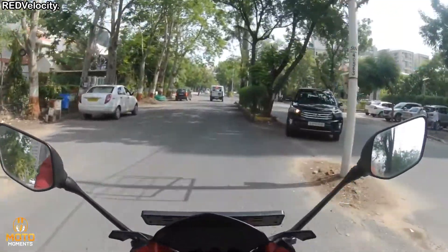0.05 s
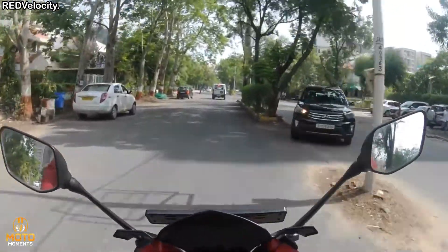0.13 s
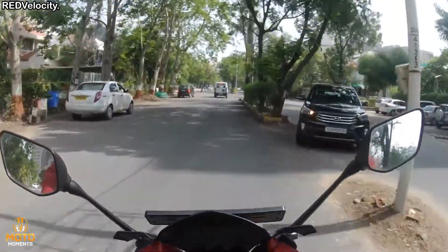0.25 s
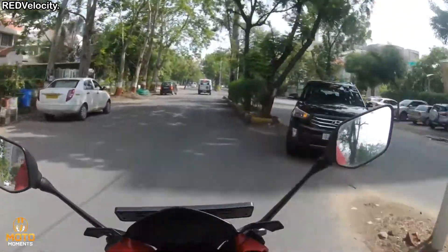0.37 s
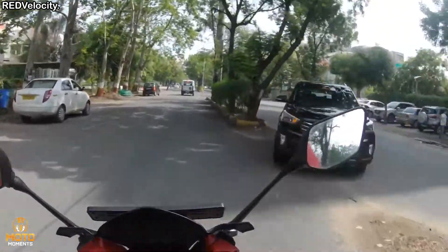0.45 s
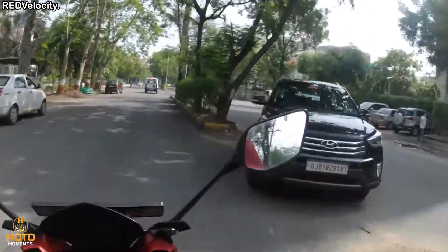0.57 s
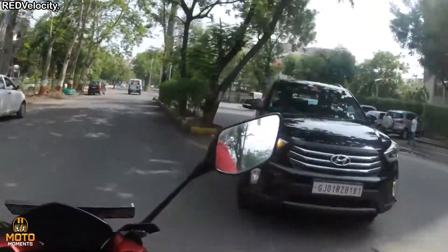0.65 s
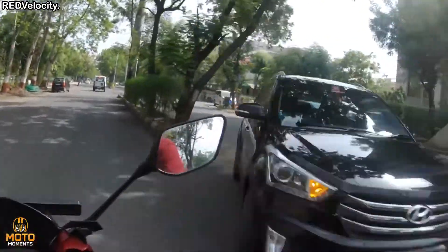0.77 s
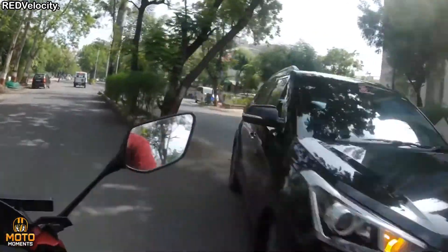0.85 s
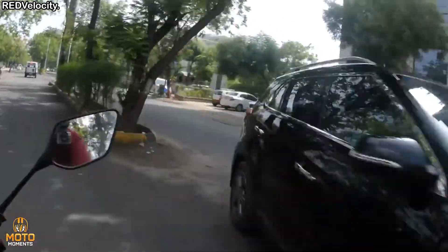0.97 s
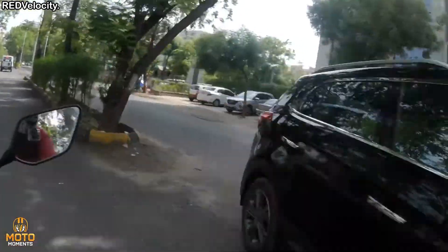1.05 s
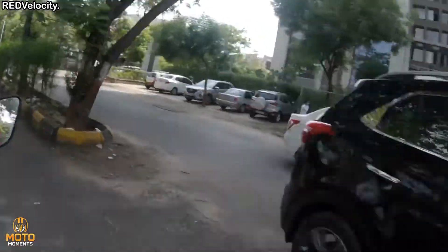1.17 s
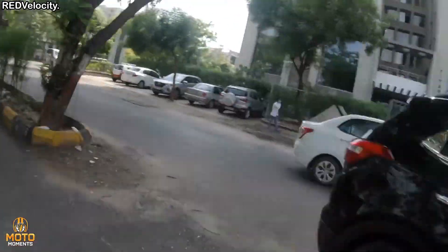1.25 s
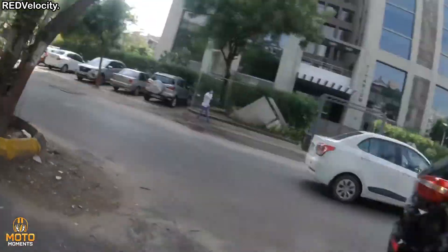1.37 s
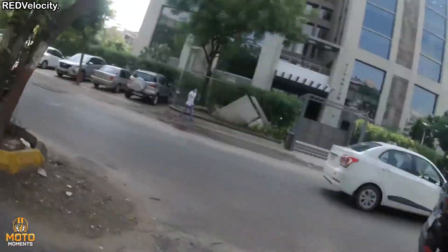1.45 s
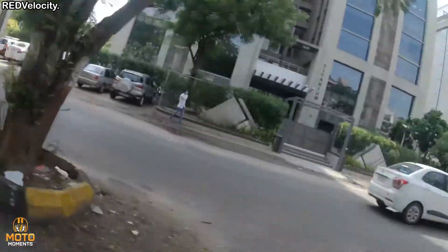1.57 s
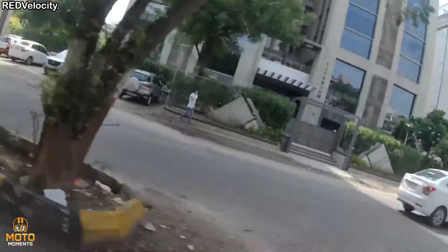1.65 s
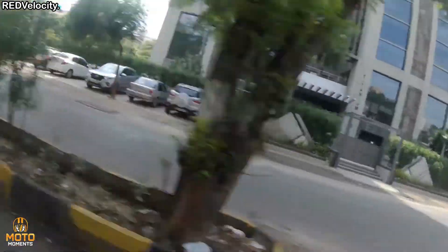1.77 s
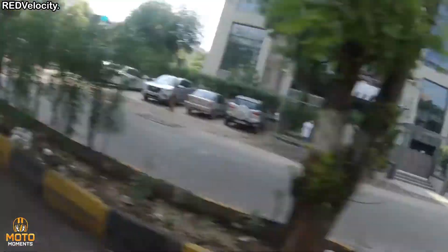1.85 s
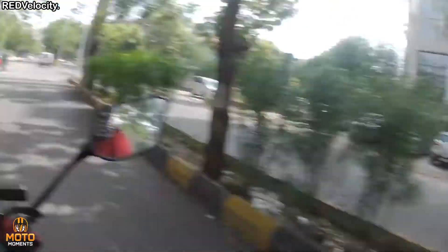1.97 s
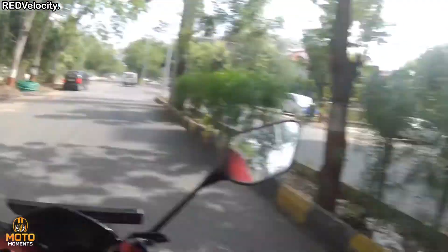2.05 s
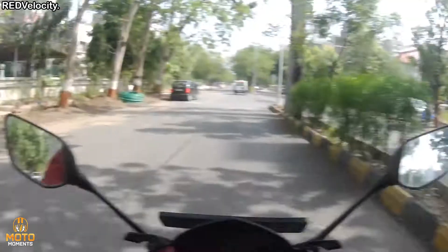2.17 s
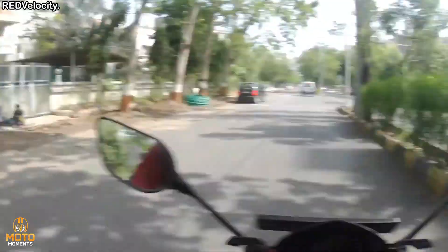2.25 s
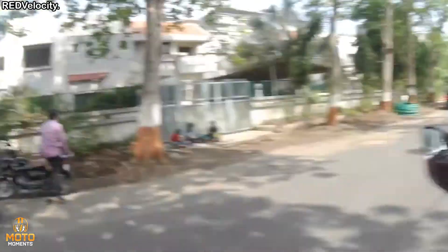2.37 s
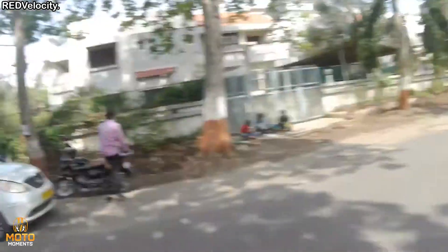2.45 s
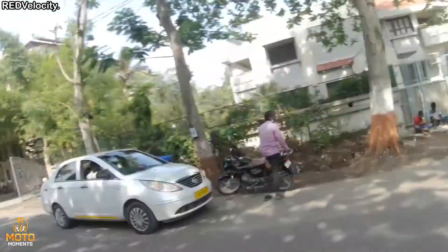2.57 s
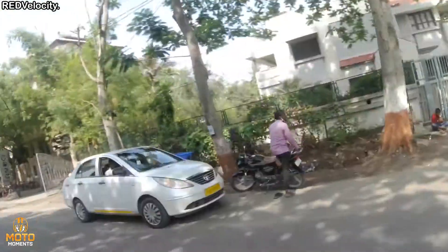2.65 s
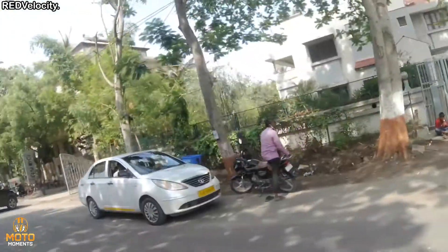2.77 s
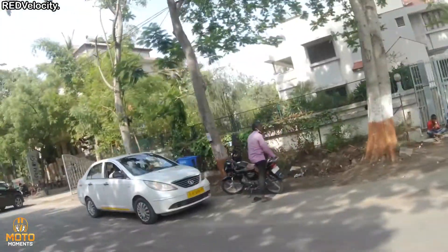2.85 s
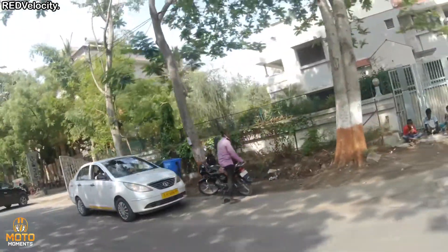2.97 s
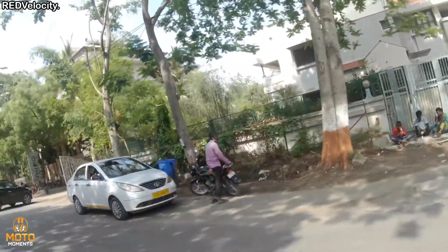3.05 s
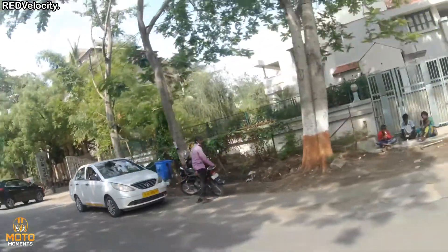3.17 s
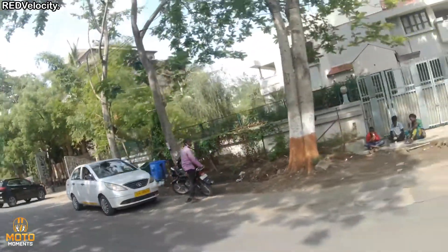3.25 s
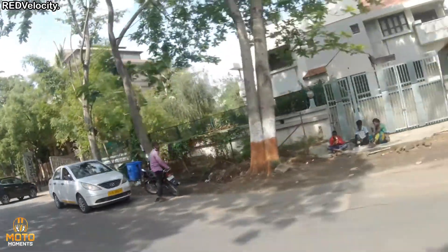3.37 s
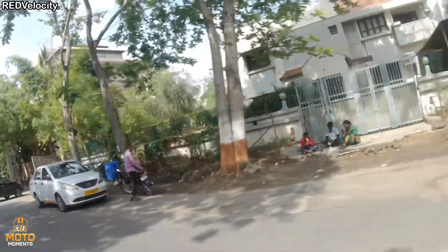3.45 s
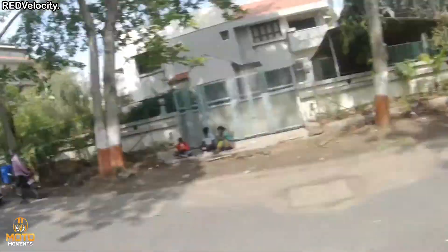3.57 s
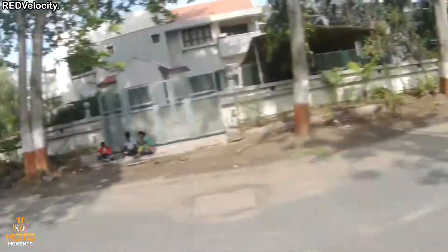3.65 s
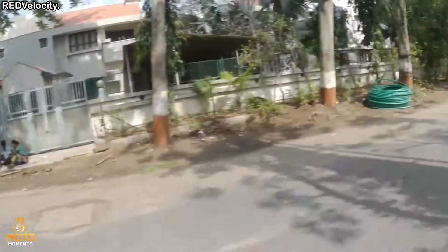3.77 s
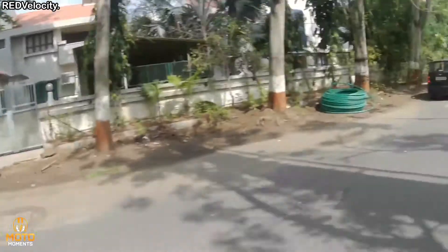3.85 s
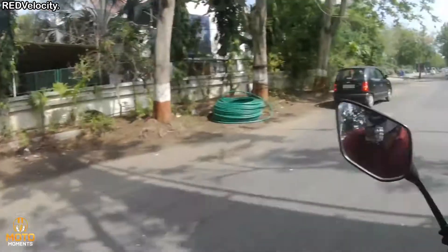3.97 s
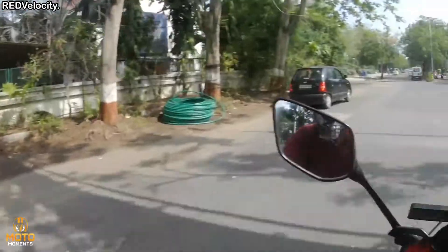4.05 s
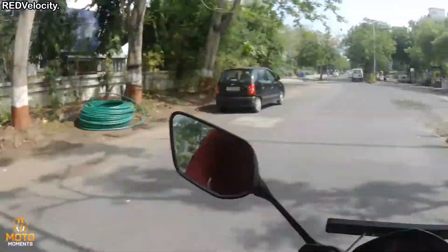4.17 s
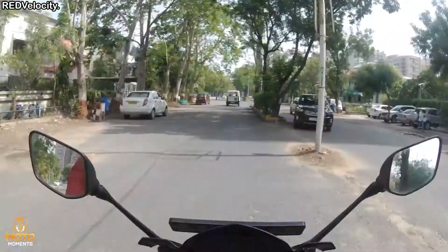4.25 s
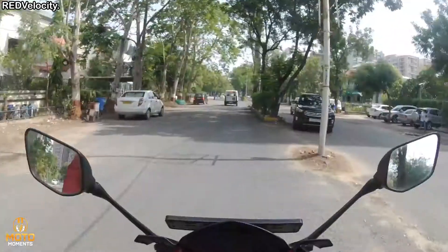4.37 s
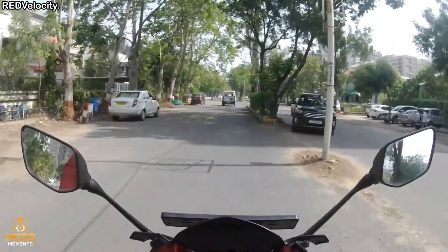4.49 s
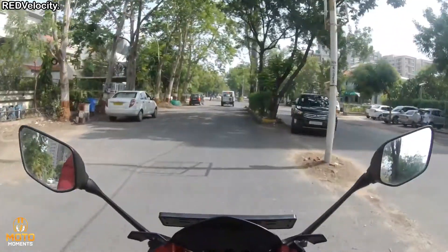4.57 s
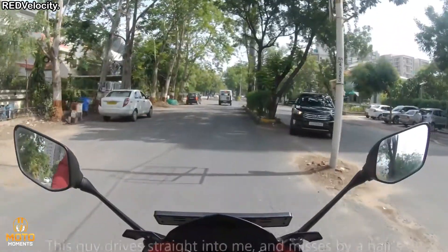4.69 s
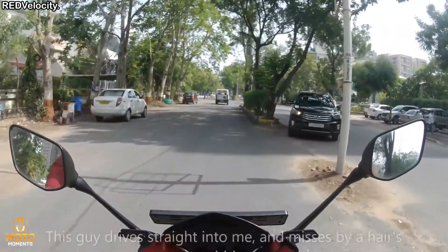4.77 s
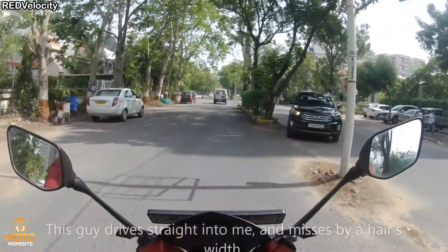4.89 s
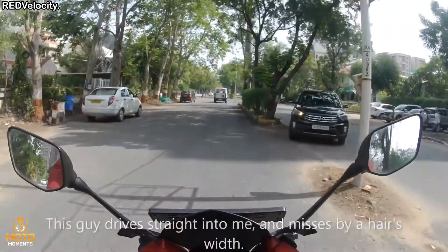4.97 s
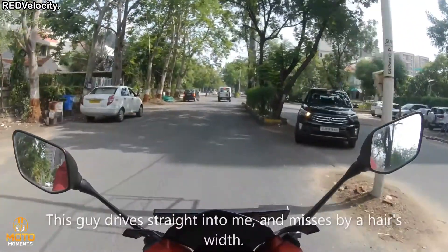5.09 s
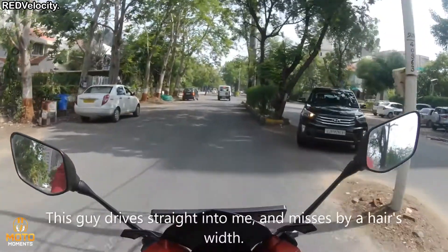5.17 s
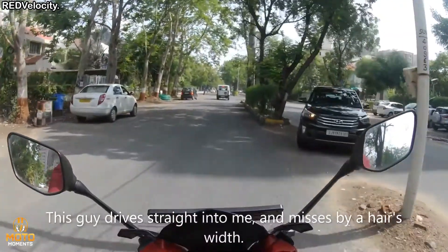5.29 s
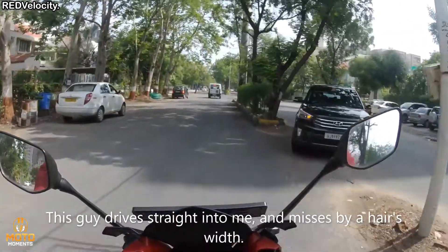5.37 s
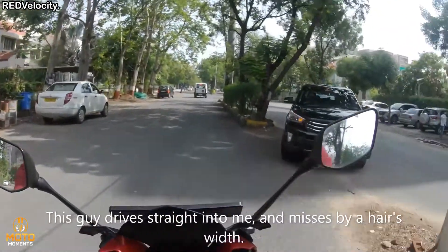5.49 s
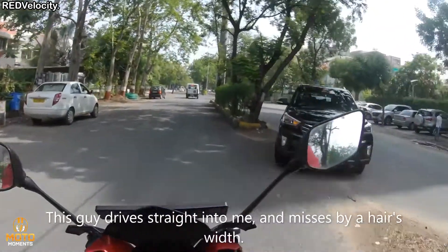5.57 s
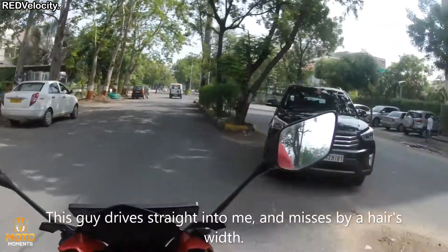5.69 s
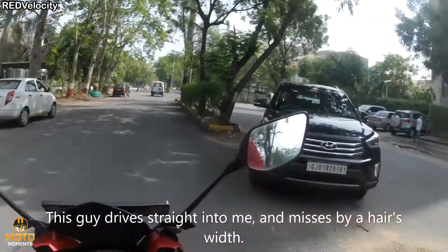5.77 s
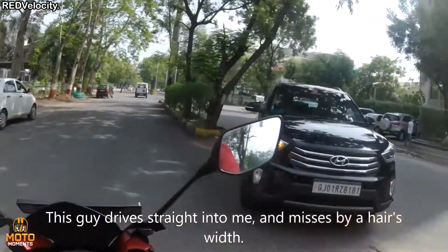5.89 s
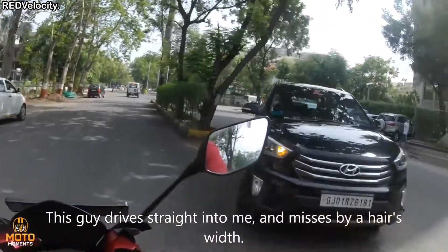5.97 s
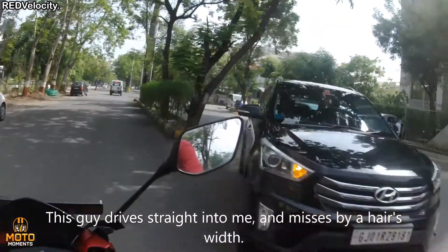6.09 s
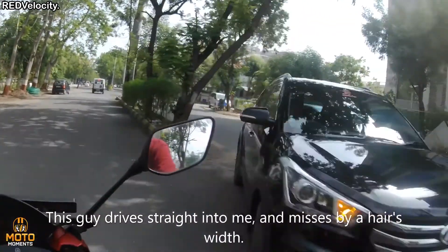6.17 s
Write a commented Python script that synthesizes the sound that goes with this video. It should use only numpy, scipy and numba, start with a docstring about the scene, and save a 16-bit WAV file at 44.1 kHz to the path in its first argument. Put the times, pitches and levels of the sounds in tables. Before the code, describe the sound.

A single-cylinder motorcycle thumps and clatters along a street, one harsh two-tone horn blast, helmet knocks and wind, then everything repeats slowed and lower.

```python
"""A street, heard at two microphone ports on a rider's helmet: a slow single-cylinder motorcycle thumps and clatters.
Firing-rate harmonics make the thumps; filtered noise swelling at each firing makes the engine clatter and treble.
Shaped noise makes wind, rustle and air hiss; decaying sines make knocks; two sets of overtones make one horn blast.
After a short fade the first moments are played again in slow motion, at four sevenths of the speed."""
import sys
import numpy as np
from scipy import signal
from scipy.fft import rfft, irfft, next_fast_len
from scipy.io import wavfile
from scipy.ndimage import uniform_filter1d
from numba import njit

SR = 44100
rng = np.random.default_rng(int(sys.argv[2]) if len(sys.argv) > 2 else 0)


def bounce(signal):
    """Save signal as a 16-bit WAV file at the path given by the first command-line argument."""
    frames = np.transpose(np.atleast_2d(signal))
    limited = np.clip(frames, -1, 1)
    pcm = np.round(limited * 32767).astype(np.int16)
    wavfile.write(sys.argv[1], SR, pcm)


def rack_gain(trim_db):
    """Turn a fader trim in dB into the linear factor to multiply a signal by."""
    fader = np.asarray(trim_db, float)
    return 10 ** (fader / 20)


N = 274743

LEAD_S = 0.21  # ride computed ahead of time zero
T = np.arange(-int(LEAD_S * SR), int(4.4 * SR)) / SR  # ride time, s
PRESS_S, HORN_ATTACK_S, HISS_END_S = 0.203, 0.007, 0.555

# engine treble spectrum: (frequency [Hz], relative density [dB])
TREBLE_COLOUR = [(1200, -25), (1700, 0.5), (2000, -1.5), (2600, -8.5), (3300, -9), (3800, -12.5),
                 (4600, -21.5), (5200, -29.5), (6700, -36.5), (9500, -47.5), (10500, -130)]


def curve(rows):
    """Interpolates the columns of a (time, ...) table over the ride."""
    s, *columns = np.transpose(rows)
    return [np.interp(T, s, c) for c in columns]


def after(s):
    """Seconds since a moment, zero before it."""
    return np.clip(T - s, 0, None)


def unit(x):
    """Scales to rms 1."""
    return x / np.sqrt(np.mean(x ** 2))


def noise():
    """Two unrelated white noises."""
    return rng.standard_normal((2, len(T)))


def walk(rate_hz):
    """Random levels held 1 / rate_hz and slewed twice; spread near 1."""
    hold = int(SR / rate_hz)
    steps = np.repeat(rng.standard_normal(len(T) // hold + 1), hold)
    smooth = uniform_filter1d(uniform_filter1d(steps, hold), hold)
    return 1.055 * smooth[:len(T)]


def shape(x, points, peaks=()):
    """Minimum-phase filter from (Hz, dB) points plus (Hz, width Hz, dB) resonances."""
    size = next_fast_len(len(T), True)
    f = np.arange(size // 2 + 1) * SR / size + 1  # +1 Hz avoids log(0)
    hz, db = np.transpose(points)
    db = np.interp(np.log(f), np.log(hz), db)
    for peak_hz, width_hz, top_db in peaks:
        db = db + top_db / (1 + (2 * (f - peak_hz) / width_hz) ** 2)
    # folding the cepstrum makes the response causal
    cepstrum = irfft(db * np.log(10) / 20, size)
    cepstrum[1:size // 2] *= 2
    cepstrum[size // 2 + 1:] = 0
    response = np.exp(rfft(cepstrum))
    return irfft(rfft(x, size) * response, size)[..., :len(T)]


def air_hiss():
    """Thin steady hiss of air past the ports."""
    # (frequency [Hz], relative density [dB])
    colour = [(2500, -32), (4200, -2), (6000, -11), (9500, -21), (10500, -90)]
    return unit(shape(noise(), colour)) * rack_gain(-78)


def wind():
    """Low noise, randomly swelling: slow buffeting around the helmet with a boom resonance."""
    # gust level: (time [s], level [dB])
    level = [(0.0, -46), (0.5, -57.5), (0.98, -51), (1.11, -37), (1.58, -40.5), (1.75, -47.5), (2.01, -54),
             (2.12, -42.5), (2.5, -61.5), (2.61, -39.5), (2.86, -38.5), (3.0, -47), (3.28, -42.5),
             (3.54, -35), (3.94, -58), (4.12, -50), (4.3, -62.5)]
    # (frequency [Hz], relative density [dB])
    colour = [(10, -19), (25, -15), (55, -6.5), (75, -10.5), (110, -13), (200, -22), (500, -54.5),
              (3000, -130)]
    # boom: (frequency [Hz], width [Hz], height [dB])
    boom = [(55, 9.3, 2.5)]
    buffeting = noise() * rack_gain(2.2 * walk(4.5))
    return unit(shape(buffeting, colour, boom)) * rack_gain(curve(level)[0])


def rustle():
    """Grainy lining noise as the head turns: each rub starts, drifts in strength and lets go."""
    # rubs: (start [s], length [s], mid-rub level [dB], drift [dB/s], relative hiss [dB], attack [s])
    rubs = [(1.179, 0.045, -38.5, -59, -4, .03), (1.409, .2, -38, -22, 5.5, 0.029),
            (1.758, 0.067, -36.5, -100, 2, 0.034), (2.306, 0.064, -59, 4, -10.5, 0.042),
            (2.639, 0.12, -35.5, -34, 0.5, 0.02), (2.79, 0.098, -40, 6, -2.5, .015),
            (3.192, 0.042, -37.5, 34.5, -14, 0.0073), (3.464, 0.13, -35, -16.5, -2, 0.0066)]
    # lining: (frequency [Hz], relative density [dB])
    colour = [(200, -41), (470, -10), (800, -28), (1100, -2.5), (1400, -11), (1720, -19.5), (2000, -13),
              (2500, -37), (4800, -39), (6600, -49.5), (7300, -72), (9500, -82), (10500, -140)]
    # shell resonances: (frequency [Hz], width [Hz], height [dB])
    shell = [(1090, 50, 6), (4800, 300, 5), (6050, 300, 6)]
    hiss_from_hz, release_s = 2400, 0.025

    def hold(start_s, end_s, attack_s):
        return (1 - np.exp(-after(start_s) / attack_s)) * np.exp(-after(end_s) / release_s)

    grain_db = 1.6 * walk(70) + 1.1 * walk(20)
    rub = unit(shape(noise() * rack_gain(grain_db), colour, shell))
    body = signal.sosfilt(signal.butter(4, hiss_from_hz, "low", fs=SR, output="sos"), rub)
    hiss = signal.sosfilt(signal.butter(4, hiss_from_hz, "high", fs=SR, output="sos"), rub)
    # faint rubbing while the rider keeps looking round
    out = rack_gain(-51.5 + 1.7 * walk(12)) * hold(1.4, 3.3, 0.1) * rub
    for s, length_s, db, drift, hiss_db, attack_s in rubs:
        drift_db = drift * (np.clip(T - s, 0, length_s) - length_s / 2)
        strength = hold(s, s + length_s, attack_s) * rack_gain(db + drift_db)
        out = out + strength * (body + rack_gain(hiss_db) * hiss)
    return out


def knocks():
    """Knocks on the helmet: a short 800 Hz tick, then the shell's modes ring as decaying sines."""
    # (time [s], level of each of the four modes [dB])
    blows = [(3.068, -47, -39.5, -48.5, -38.5), (3.168, -33, -39, -39, -29.5),
             (3.346, -36, -27.5, -40, -22.5), (3.526, -19.5, -40.5, -25.5, -17)]
    # (frequency [Hz], t60 [s])
    modes = [(260, 0.031), (460, 0.069), (824, 0.057), (1100, 0.027)]
    tick_db = -5.5  # against the strongest mode
    out = np.zeros(len(T))
    t = np.arange(int(0.15 * SR)) / SR
    rise = 1 - np.exp(-(t / 0.0005) ** 2)  # a soft push
    for s, *modes_db in blows:
        blow = rack_gain(max(modes_db) + tick_db) * np.exp(-t / 0.002) * np.sin(2 * np.pi * 800 * t)
        for (hz, t60_s), db in zip(modes, modes_db):
            blow = blow + rack_gain(db) * np.exp(-np.log(1000) * t / t60_s) * np.sin(2 * np.pi * hz * t)
        at = np.searchsorted(T, s)
        out[at:at + len(t)] += blow * rise
    return out


def blast(driven_hz, free_hz, sag_hz_per_s, lock_s, end_s, membrane_s, overtones_s):
    """Pitch, membrane and overtone strength: the buzzer pulls the membrane from its free pitch, sags, rings out."""
    on, off = after(PRESS_S), after(end_s)
    lock = 1 - np.exp(-on / lock_s)
    driven = np.exp(-(off / 0.007) ** 2)  # pitch falls back after cut-off
    hz = free_hz + (driven_hz - sag_hz_per_s * on - free_hz) * lock * driven
    attack = 1 - np.exp(-(on / HORN_ATTACK_S) ** 2)
    membrane = attack * rack_gain(-60 * (off / membrane_s) ** 2)
    overtones = attack * lock * rack_gain(-60 * off / overtones_s)
    return hz, membrane, overtones


def horn_tones():
    """Two buzzer horns on one wire: each pulls the other's timing and strength at their beat."""
    # low, high: (driven pitch [Hz], free pitch [Hz], sag [Hz/s], lock time [s], cut-off [s],
    #             membrane ring-out [s], overtone ring-out [s])
    horn_rows = [(339.6, 305, 2.5, .011, .55, .13, .04), (391.5, 388, 5, .004, .543, .075, .045)]
    # overtones: (multiple [1], nominal level [dB], left minus right [dB], left lead [rad])
    low_tones = [(1, -37, -2, 0.2), (2, -66, -9, 0.2), (3, -48, -1, -0.3), (4, -48, -9, -0.6),
                 (5, -59, -1, 2.4), (6, -52, -1, -3.0), (7, -47, 1, -1.8), (8, -47, 0, -0.8),
                 (9, -38, -14, 0.8), (10, -21, -1, 2.66), (11, -43, -1, 2.7), (12, -62, -11, 2.0),
                 (13, -57, -7, 0.6), (14, -62, -13, 1.7), (17, -65, -5, 2.1)]
    high_tones = [(1, -42, -3, 0.1), (2, -59, 2, 0.0), (3, -60, -9, -0.5), (4, -60, -30, 1.3),
                  (5, -44, -1, -2.5), (6, -40, 12, -0.4), (7, -38, -2, 0.8), (8, -32.5, -8, 0.2),
                  (9, -27, -2, -0.3), (10, -42.5, -10, 2.4), (11, -51, -3, -1.4), (12, -59, -16, 0.4),
                  (13, -69, -4, 0.6), (14, -63, -6, -0.5), (15, -70, -3, 0), (16, -72, -1, -1.9),
                  (17, -70, 5, -2.0), (18, -75, -5, -2.9), (19, -76, 0, 2), (20, -78, -3, -2),
                  (21, -59, -5, 2.8), (22, -78, 9, 0.3), (23, -74, -3, 2.5), (24, -73, -8, -0.1)]
    # growth or fading as the horns turn: (frequency [Hz], rate [dB/s])
    drift = [(1000, -3.5), (2400, -3), (3050, -2), (3130, -16), (3390, 18), (3520, 4.5), (4300, -14),
             (9000, 4.5)]
    # high overtone less the low pitch: (high multiple [1], nominal level [dB])
    blends = [(9, -45), (8, -51.5)]
    low, high = (blast(*row) for row in horn_rows)
    turns = [2 * np.pi * np.cumsum(horn[0] * (1 + 0.00098 * walk(45))) / SR for horn in (low, high)]
    beat = turns[1] - turns[0]
    # the contacts never close twice alike
    rattle = rack_gain(1.3 * walk(180) + 0.18 * np.array([walk(1500), walk(1500)]))
    from_middle_s = np.clip(T, PRESS_S, HISS_END_S) - (PRESS_S + HISS_END_S) / 2
    side = np.array([[0.5], [-0.5]])
    pulls_rad, swells = (0.012, 0.032), (-0.1, 0.14)
    out = 0
    for horn, turn, tones, pull, swell in zip((low, high), turns, (low_tones, high_tones), pulls_rad, swells):
        hz, membrane, overtones = horn
        for k, db, tilt_db, lead in tones:
            # short waves drop out most as the head shifts
            waver_db = 0.027 * k ** 2 * np.clip(walk(12), -2, 0.25)
            drift_db = np.interp(k * hz.max(), *np.transpose(drift)) * from_middle_s
            envelope = membrane if k == 1 else overtones
            size = np.sqrt(2) * rack_gain(db + waver_db + drift_db) * envelope
            size = size * (1 + swell * np.cos(beat)) * rattle
            phase = k * (turn + pull * np.sin(beat)) + 2 * np.pi * rng.random() + side * lead
            out = out + size * rack_gain(side * tilt_db) * np.sin(phase)
    for k, db in blends:
        out = out + np.sqrt(2) * rack_gain(db) * high[2] * low[2] * np.sin(round(k) * turns[1] - turns[0])
    return out


def horn_hiss():
    """Hissy noise under the horn blast, with a brighter burst at its onset."""
    # hiss under the blast: (frequency [Hz], relative density [dB])
    under_colour = [(1200, -44.5), (2150, -24), (2350, -14), (2560, -24.5), (2800, -7.5), (3400, 1),
                    (4400, -8.5), (4900, -34), (5500, -44.5), (8000, -51), (9500, -48), (10200, -110)]
    # burst at the onset: (frequency [Hz], relative density [dB])
    onset_colour = [(1500, -21), (3400, 2), (5500, -22.5), (7000, -30), (8500, -27), (9600, -32.5),
                    (10200, -90.5)]
    on = after(PRESS_S)
    under_t60_s, onset_s = 0.05, 0.081
    under = unit(shape(noise(), under_colour)) * rack_gain(-41 - 60 * after(HISS_END_S) / under_t60_s)
    onset = unit(shape(noise(), onset_colour)) * rack_gain(-39) * np.exp(-(on / onset_s) ** 2)
    return (under + onset) * (1 - np.exp(-(on / HORN_ATTACK_S) ** 2))


def street_echo(sound):
    """Diffuse echo: decaying noise for walls and cars close by and for the longer street."""
    # (frequency [Hz], gain [dB])
    colour = [(300, -15), (1800, 2.5), (2700, -6), (3500, -3), (4000, 4), (4400, 0.5), (5200, -5),
              (9000, -20)]
    t = np.arange(int(1.2 * SR)) / SR

    def decay(db, t60_s):
        return rack_gain(db - 60 * t / t60_s) * np.sqrt(2 * np.log(1000) / t60_s / SR)

    # leaves and moving cars blur each overtone
    smeared = np.mean(sound, axis=0) * (0.1 + 0.9 * np.array([walk(300), walk(300)]))
    near, far = decay(-9.5, 0.2), decay(-16, 1)
    echo = rng.standard_normal((2, len(t))) * np.hypot(near, far)
    return shape(signal.fftconvolve(smeared, echo, axes=1)[:, :len(T)], colour)


def horns():
    """One blast of both horns, with the street's answer."""
    direct = horn_tones() + horn_hiss()
    return rack_gain(2.5) * (direct + street_echo(direct))


def firing():
    """Firing rate with slight jitter, counted in cycles; each firing has its own strength."""
    # (time [s], firing rate [Hz], exhaust level [dB])
    ride_rows = [(0.0, 29.62, -49.5), (0.45, 30.8, -48), (0.95, 32.04, -50), (1.04, 31.69, -42.5),
                 (1.22, 29.24, -39), (1.38, 31.36, -54.5), (1.47, 30.83, -38.5), (2.07, 28.98, -40.5),
                 (2.51, 27.24, -42.5), (2.66, 26.56, -43.5), (3.0, 26, -44), (3.38, 25.39, -46),
                 (3.88, 24.33, -47), (4.0, 25.96, -44), (4.14, 23.09, -46.5), (4.23, 24.8, -39),
                 (4.3, 24.07, -44)]
    hz, exhaust_db = curve(ride_rows)
    cycles = 0.3055 + np.cumsum(hz * (1 + 0.0056 * walk(30))) / SR
    strength = uniform_filter1d(rack_gain(rng.standard_normal(400))[cycles.astype(int)], 300)
    return hz, exhaust_db, cycles, strength


def car_flanks(puff):
    """The flank of a passing car throws each puff back."""
    # (time [s], half length [s], peak level [dB])
    passes = [(0.914, .14, -51), (1.28, 0.083, -57)]
    # (frequency [Hz], width [Hz], height [dB])
    flank = [(2730, 450, 12)]
    near = sum(rack_gain(db) * np.exp(-((T - s) / half_s) ** 2) for s, half_s, db in passes)
    return unit(shape(noise() * (0.2 + puff), TREBLE_COLOUR, flank)) * near


def clatter(puff):
    """Valve and gas noise in the helmet's resonance, swelling with each firing."""
    # (time [s], level [dB])
    level = [(0, -39.5), (.6, -38.5), (1, -38.5), (1.4, -37.5), (1.8, -37), (2.2, -40.5), (2.6, -41),
             (3.1, -41.5), (3.7, -42.5), (4.3, -42)]
    # (frequency [Hz], relative density [dB])
    colour = [(100, -5.5), (200, -10), (450, -12), (800, -12.5), (1100, -10), (1270, -9.5), (1450, -11),
              (1700, -19.5), (2200, -66), (5000, -130)]
    # (frequency [Hz], width [Hz], height [dB])
    helmet = [(1268, 46, 12.5), (285, 25, 6)]
    return unit(shape(noise() * (0.9 + puff), colour, helmet)) * rack_gain(curve(level)[0])


def engine_treble(puff):
    """Treble of the engine through its case resonances, swelling with each firing."""
    # (time [s], level [dB])
    level = [(0, -56.5), (.2, -55), (.3, -61), (.7, -54.5), (.8, -52.5), (1.1, -53.5), (1.7, -56),
             (2.15, -58), (2.6, -58.5), (3, -62), (3.5, -61), (4.1, -58), (4.3, -60)]
    # case: (frequency [Hz], width [Hz], height [dB])
    fins = [(2600, 51, 2), (3820, 240, 3.5)]
    return unit(shape(noise() * (1.4 + puff), TREBLE_COLOUR, fins)) * rack_gain(curve(level)[0])


def fin_ring(puff):
    """Narrow ringing noise band in the engine's treble."""
    # (time [s], level [dB])
    level = [(0, -68), (.7, -71), (1.1, -64.5), (1.5, -57), (1.8, -59.5), (2.1, -64), (2.5, -69),
             (3.2, -77), (3.8, -72.5), (4.3, -72)]
    # (frequency [Hz], relative density [dB])
    colour = [(1500, -70), (2350, -18), (2580, 0), (2700, -3), (2820, -1), (3100, -18), (5000, -80),
              (8000, -150)]
    return unit(shape(noise() * (0.5 + puff), colour)) * rack_gain(curve(level)[0])


def singing(cycles):
    """Engine orders that sing with wavering level while the throttle is open."""
    # (multiple of firing rate [1], nominal level [dB])
    orders = [(14, -63.5), (15, -56.5), (17, -60), (20, -57)]
    shut_s, fade_s = 1.2, 0.02
    tones = 0
    for k, db in orders:
        phase = 2 * np.pi * (round(k) * cycles + rng.random())
        tones = tones + np.sqrt(2) * rack_gain(db + 3 * walk(9.8)) * np.sin(phase)
    return tones * np.exp(-after(shut_s) / fade_s)


def exhaust(hz, exhaust_db, cycles, strength):
    """Harmonics of the firing rate, boosted near the silencer's resonance, thump once a firing."""
    # (multiple of firing rate [1], relative level [dB])
    harmonics = [(1, -15), (2, -1), (3, -6), (4, -3), (5, -7), (6, -17), (7, -20), (8, -21), (9, -19),
                 (10, -18), (11, -21), (12, -21), (13, -21), (14, -23), (15, -20), (16, -22)]
    silencer_hz, width_hz, height_db = 119.5, 77, 16
    thumps = 0
    for k, db in harmonics:
        boom_db = height_db / (1 + (2 * (k * hz - silencer_hz) / width_hz) ** 2)
        # higher multiples leave the pipe a little later, which turns the click into a thump
        thumps = thumps + rack_gain(db + boom_db) * np.cos(2 * np.pi * k * cycles - 0.2 * k ** 2)
    return unit(thumps) * strength * rack_gain(exhaust_db)


def engine():
    """All engine sounds, locked to the same firings."""
    hz, exhaust_db, cycles, strength = firing()
    puff = strength * uniform_filter1d(np.exp(-(cycles % 1) / 0.45), 220)
    noises = car_flanks(puff) + clatter(puff) + engine_treble(puff) + fin_ring(puff)
    return noises + singing(cycles) + exhaust(hz, exhaust_db, cycles, strength)


def ports(pair):
    """Left hears a tilted, phase-shifted share of the right port's sound; the rest is its own (first row right)."""
    # (frequency [Hz], left minus right [dB], left lead [rad], likeness [0-1])
    port_rows = [(30, -8.5, .3, .98), (60, -7, .35, .98), (170, -3.5, .5, .95), (520, -1.5, 0, .85),
                 (860, -1, -.3, .88), (1200, -4.5, -.5, .98), (1550, -7, -1.2, .5), (1900, 1, -3.1, .55),
                 (2250, 3, -3.1, .55), (2600, 3, -7, .5), (3200, -6, -4, .3), (3900, -8, -7.5, .2),
                 (4700, -3, -9.5, .2), (6000, 0, -9.5, .15)]
    size = next_fast_len(len(T), True)
    f = np.arange(size // 2 + 1) * SR / size
    hz, *columns = np.transpose(port_rows)
    tilt_db, lead, like = (np.interp(f, hz, c) for c in columns)
    like = np.clip(like, 0, 1)
    right, own = rfft(pair, size)
    left = like * np.exp(1j * lead) * right + np.sqrt(1 - like ** 2) * own
    return irfft([left * rack_gain(tilt_db / 2), right * rack_gain(-tilt_db / 2)], size)[:, :len(T)]


@njit
def follow(power, attack, release):
    """One-pole follower, quick to rise, slow to fall."""
    out, e = np.empty(len(power)), 0.
    for i in range(len(power)):
        e += (power[i] - e) * (attack if power[i] > e else release)
        out[i] = e
    return out


def gain_control(sound):
    """Loud sound turns everything down; the gain recovers slowly."""
    knee_db, slope, attack_s, release_s = -22.5, 0.28, 0.002, 1
    power = uniform_filter1d(np.mean(sound ** 2, axis=0), size=441)
    loud = follow(power, 1 / (attack_s * SR), 1 / (release_s * SR))
    return sound * (1 + loud / rack_gain(2 * knee_db)) ** (-slope / 2)


def slow_motion(ride):
    """Stretched 7 to 4 by straight lines between 48 kHz samples, which leaves faint high mirror tones."""
    zero_s = 4.68431  # where ride time zero falls in the replay
    fine = signal.resample_poly(ride, 160, 147, axis=1)
    start = round((zero_s + T[0] * 7 / 4) * 48000)
    place = (np.arange(N * 160 // 147 + 1) - start) * 4 / 7
    slow = [np.interp(place, np.arange(len(c)), c) for c in fine]
    return signal.resample_poly(slow, 147, 160, axis=1)[:, :N]


def scene():
    """The ride fades out, then the slowed ride fades in."""
    fade_at_s, fade_s = 4.333, 0.032
    at_helmet = ports(air_hiss() + wind() + rustle() + knocks() + engine())
    ride = gain_control(at_helmet + horns())
    full_speed = np.zeros((2, N))
    full_speed[:, :np.sum(T >= 0)] = ride[:, T >= 0]
    away = (np.arange(N) / SR - fade_at_s) / fade_s
    return full_speed * np.clip(-away, 0, 1) ** 2.5 + slow_motion(ride) * np.clip(away, 0, 1) ** 1.2


def low_pass(x):
    """Removes everything above the highest recorded frequency."""
    return signal.sosfilt(signal.butter(12, 15750, fs=SR, output="sos"), x)


def record(dry):
    """Turns the finished mix into the output sound."""
    return low_pass(dry)


dry = scene()
out = record(dry)
bounce(out)
```